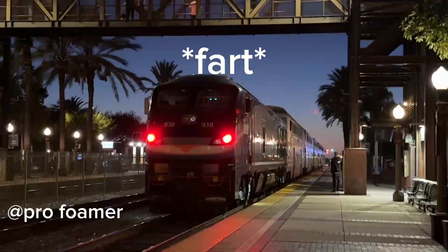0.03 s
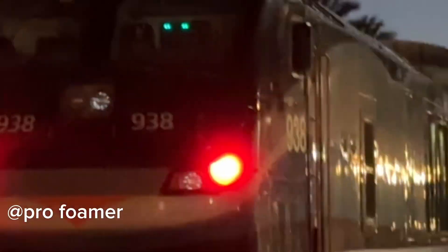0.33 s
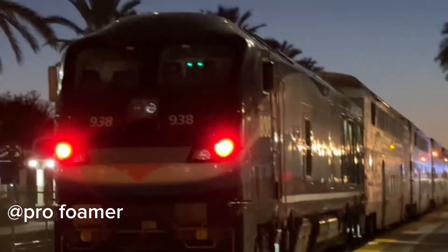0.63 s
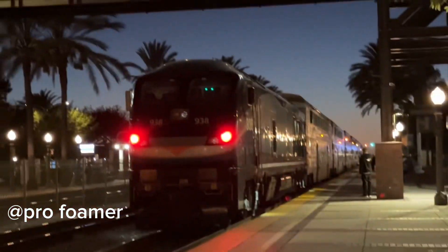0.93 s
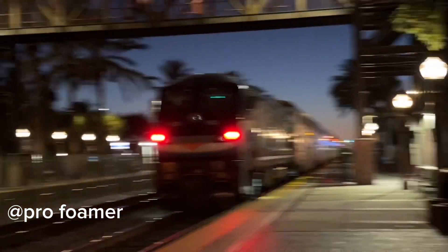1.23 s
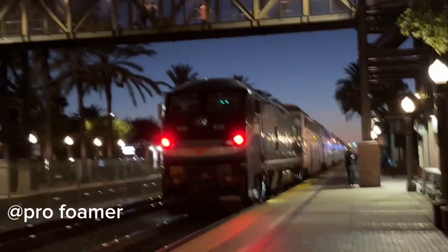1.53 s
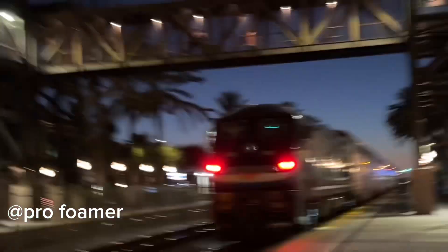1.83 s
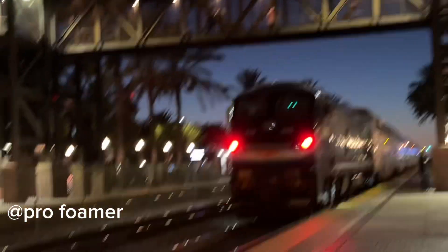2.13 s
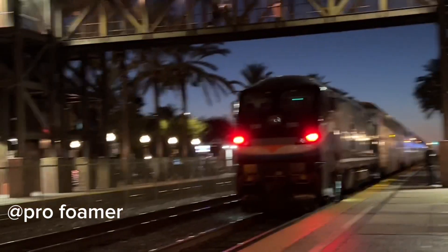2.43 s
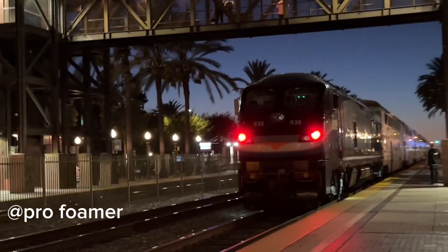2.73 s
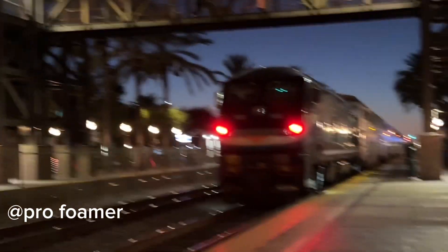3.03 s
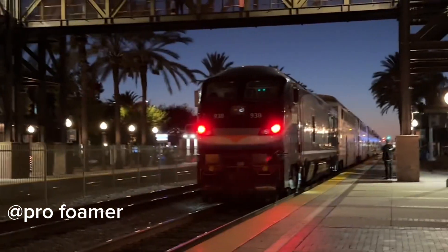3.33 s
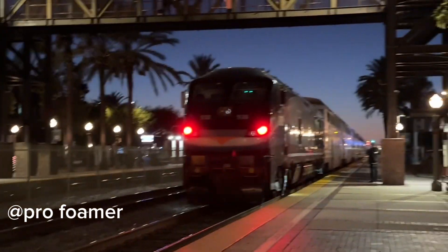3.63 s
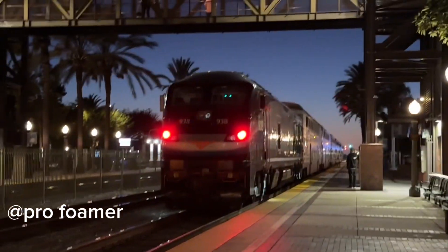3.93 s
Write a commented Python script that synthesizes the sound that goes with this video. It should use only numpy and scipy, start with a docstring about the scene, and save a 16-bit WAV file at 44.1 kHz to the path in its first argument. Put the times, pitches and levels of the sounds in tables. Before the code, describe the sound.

Sharp hisses of air come from a diesel locomotive idling beside an outdoor platform. The low rumble and fan hum run alone at first, then come a burst, a faint leak and a stronger burst, each burst ringing on briefly.

```python
"""An open station platform, where a diesel locomotive idles: throbbing exhaust, fans, electrical hum.
Its air brakes vent through a pipe: a blast that ends in a thin whistle as the valve closes,
a soft steady bleed, then a louder, brighter blast. The hiss rings on between train, platform
and footbridge. The stereo image is mostly narrow, but the top of the hiss sounds wide."""
import sys
import numpy as np
from scipy import signal
from scipy.fft import rfft, irfft, next_fast_len
from scipy.io import wavfile
from scipy.ndimage import map_coordinates

SR = 44100
rng = np.random.default_rng(int(sys.argv[2]) if len(sys.argv) > 2 else 0)


def transcribe(u):
    """Save the signal u as a 16-bit wav file named by the first command-line argument.

    u: samples, shape (n,) or (channels, n), limited to [-1, 1]; the rate is SR.
    q: integer samples, one column per channel.
    """
    v = np.clip(np.atleast_2d(u).T, -1, 1)
    q = np.round(v * 32767).astype(np.int16)
    wavfile.write(sys.argv[1], SR, q)


N = 176400
CYCLE_HZ = 10.0  # the idling engine's cycle


def amp(db):
    """Decibels to gain."""
    return 10 ** (np.asarray(db) / 20)


def along(points, hz):
    """Read (f/Hz, value) points on a log frequency axis."""
    f, v = np.transpose(points)
    return np.interp(np.log(hz + 1), np.log(f + 1), v)


def seconds():
    """The time of every sample."""
    return np.arange(N) / SR


def curve(rows):
    """An envelope of straight lines through (t/s, value) points."""
    return np.interp(seconds(), *np.transpose(rows))


def wobble(rate):
    """Smooth random modulation, rate knots a second."""
    knots = rng.standard_normal(int(N * rate / SR) + 4)
    return map_coordinates(knots, [seconds() * rate], mode="nearest")


def filtered(x, response):
    """EQ x with a response given as a function of frequency."""
    size = next_fast_len(N + SR // 4)
    return irfft(rfft(x, size) * response(np.fft.rfftfreq(size, 1 / SR)), size)[..., :N]


def rush(spectrum, pulsing=1):
    """Two unrelated noises, pulsed and then coloured to the given level per hertz."""
    white = rng.standard_normal((2, N))
    return filtered(white * pulsing, lambda hz: amp(along(spectrum, hz))) * np.sqrt(SR / 2)


def tone(hz):
    """A sine of rms 1 that follows a pitch curve."""
    return np.sqrt(2) * np.sin(2 * np.pi * (np.cumsum(hz) / SR + rng.random()))


# Partials of the exhaust drone: multiple of the engine cycle, level/dB
EXHAUST_PARTIALS = [(4, -42), (5, -31), (6, -35), (7, -35.5), (8, -59.5), (9, -38.5), (10, -24.5),
                    (11, -49), (12, -44), (13, -42), (14, -55.5), (15, -39), (16, -46), (17, -46),
                    (18, -43), (19, -43), (20, -53), (21, -44), (26, -49.5), (28, -53)]
def exhaust(drift=0.00053, flutter_db=.5):
    """A throbbing drone, every partial locked to one nearly steady engine speed."""
    cycle_hz = CYCLE_HZ * (1 + drift * wobble(4.24))
    return sum(amp(db + flutter_db * wobble(3.76)) * tone(k * cycle_hz) for k, db in EXHAUST_PARTIALS)


# Colour of the exhaust rumble: f/Hz, level/dB per Hz
RUMBLE_SPECTRUM = [(20, -94), (33, -86), (45, -66), (62, -49.5), (82, -51.5), (125, -57.5), (160, -51.5),
                   (205, -60), (330, -62), (450, -68.5), (800, -87.5), (2000, -115)]
def rumble(throb=0.31, chug=0.24, flutter_db=1.3):
    """Low noise that chugs with the engine cycle and throbs with the faster exhaust beat."""
    cycle = 2 * np.pi * (CYCLE_HZ * seconds() + rng.random())
    pulsing = 1 + throb * np.sin(5 * cycle) + chug * np.sin(cycle)
    return rush(RUMBLE_SPECTRUM, pulsing * amp(flutter_db * wobble(14)))


# Colour of the fan wash: f/Hz, level/dB per Hz
FAN_SPECTRUM = [(150, -90), (450, -69), (700, -69), (950, -69.8), (1250, -71.5), (1500, -74.5), (2000, -76),
                (2500, -79.5), (3600, -84), (5000, -86.7), (7000, -88.5), (9400, -93), (10100, -98),
                (10700, -104), (11400, -107), (15500, -109.5)]
# Envelope of the band around 1.2 kHz: t/s, level/dB
MID_SWELLS = [(0, -79), (1.4, -69), (1.75, -58), (1.92, -43.5), (2.1, -66), (2.6, -73), (3.0, -80),
              (3.25, -55), (4, -68)]
def fans(flutter_db=0.44, swirl_db=2.0):
    """The cooling fans' broad wash of air, with a midrange band that swells ahead of each blast."""
    wash = rush(FAN_SPECTRUM) * amp(flutter_db * wobble(8.37))
    band = rush([(800, -51), (1120, 15), (1280, 1.5), (1700, -70)])
    swell = amp(curve(MID_SWELLS) + swirl_db * wobble(14))
    return wash + band / band.std() * swell


# Partials of the hum: multiple of its base pitch, level/dB
HUM_PARTIALS = [(3, -52), (12, -59), (14, -59.5), (15, -57), (16, -52), (18, -82)]
def electrical_hum(base_hz=120.03, flutter_db=0.9):
    """Overtones of one almost fixed pitch, each fluttering in level."""
    pitch = base_hz + .02 * wobble(2.18)
    return sum(amp(db + flutter_db * wobble(3.79)) * tone(k * pitch) for k, db in HUM_PARTIALS)


# Fan and pump tones: f/Hz, level/dB, pitch wander/Hz
WHINE_TONES = [(348, -48, 1.8), (356.4, -50, 2.13), (533, -54, 0.79), (612.3, -59.5, 2.12),
               (787, -58.5, 1.1), (928, -62.5, 3.05), (1194, -59.5, 1.65), (1596, -61, 1.05),
               (1990, -79, 0.6), (2507, -63.5, 3.3), (2610, -65.5, 3), (2638, -68, 3), (2990, -66.5, 4.15),
               (3241, -73, 4.04), (3496, -68, 2.9), (3610, -71, 4), (4200, -68, 12), (6100, -74, 11.7)]
def whines(flutter_db=0.9):
    """Spinning fans and pumps sing thin tones, each wavering on its own."""
    return sum(amp(db + flutter_db * wobble(5.99)) * tone(hz + wander * wobble(25))
               for hz, db, wander in WHINE_TONES)


# Envelope of the blower tone: t/s, level/dB
BLOWER_ENVELOPE = [(.1, -50), (1.6, -51), (2.25, -47), (2.6, -50), (3.05, -46.5), (3.2, -44), (3.6, -49),
                   (4, -50)]
def blower(pitch_hz=1075.0, wander_hz=2.1, flutter_db=0.9):
    """The blower's single whine swells and eases."""
    gain = amp(curve(BLOWER_ENVELOPE) + flutter_db * wobble(5.53))
    return gain * tone(pitch_hz + wander_hz * wobble(14))


def valve(t, rise, hold, sag, fall):
    """Envelope of the air flow: it swells, sags with the pressure and dies."""
    opening = np.sin(np.pi / 2 * np.clip(t / rise, 0, 1)) ** 2
    return opening * amp(-sag * np.clip(t - rise, 0, hold) - fall * np.maximum(t - rise - hold, 0))


# Brake cues: t/s, rise/s, hold/s, gain/dB, sag/(dB/s), fall/(dB/s), tilt/(dB/octave), roar lag/s
BRAKE_CUES = [(2.05, 0.14, 0.055, -6.5, 22, 65, -4.5, 0.056), (2.704, 0.083, 0.19, -20, -2, 9, .5, .06),
              (3.311, 0.11, .15, 3, 44, 160, 0.5, 0.045)]
# Colour of the air jet before each cue's gain and tilt: f/Hz, level/dB per Hz
JET_SPECTRUM = [(400, -99), (1000, -75), (1900, -77), (2500, -69), (3200, -69.5), (4000, -68),
                (5200, -68.5), (6500, -65), (7700, -65), (8600, -60), (9600, -62), (10300, -65.5),
                (11200, -73.5), (15500, -74)]
# Resonances of the vent pipe: f/Hz, width/Hz, boost/dB
PIPE_PEAKS = [(3170, 110, 3.5), (6150, 250, 2), (9550, 300, 0.5)]
def brake_air(roar_below_hz=5600, flutter_db=0.63):
    """Each jet starts as a thin hiss and gains body as the valve opens wide; the pipe colours it."""
    def pipe(f):
        return amp(sum(db / (1 + (2 * (f - hz) / width) ** 2) for hz, width, db in PIPE_PEAKS))

    air = np.zeros((2, N))
    for start, rise, hold, gain_db, sag, fall, tilt, lag in BRAKE_CUES:
        t = seconds() - start
        tilted = [(hz, db + tilt * np.log2(hz / 6000)) for hz, db in JET_SPECTRUM]
        jet = filtered(rush(tilted), pipe)
        lows = filtered(jet, lambda hz: 1 / (1 + (hz / roar_below_hz) ** 4))
        hiss = (jet - lows) * valve(t, rise, hold, sag, fall)
        roar = lows * valve(t, rise + lag, max(hold - lag / 2, 0), sag, fall)
        air += (hiss + roar) * amp(gain_db + flutter_db * wobble(40))
    return air


# Whistle cue: start t/s, end t/s, first f/Hz, last f/Hz, top level/dB
WHISTLE_CUE = (2.36, 2.48, 9020, 8950, -48)
def valve_whistle(waver_hz=25):
    """A thin tone that grows and sinks a little in pitch just before the valve seats."""
    start, end, first_hz, last_hz, db = WHISTLE_CUE
    swell = curve([(start, 0), (end - .01, 1), (end, 0)]) ** .5
    pitch = curve([(start, first_hz), (end, last_hz)]) + waver_hz * wobble(140)
    return amp(db) * swell * tone(pitch)


# Reverb decay: f/Hz, t60/s (taken as a magnitude after interpolation)
REVERB_DECAY = [(500, -1.2), (3000, 0.88), (7000, 0.99), (10000, .62), (15000, 0.1)]
# Reverb return EQ: f/Hz, level/dB
REVERB_EQ = [(500, -5), (3000, -2), (7000, -1.5), (10000, -5), (14000, -11)]
def station_reverb(x, build_s=0.014):
    """Echoes scattered by train, platform and footbridge build up, then fade with a dull top end."""
    hz, t, grains = signal.stft(rng.standard_normal((2, SR)), SR, nperseg=256)
    t60 = np.abs(along(REVERB_DECAY, hz))[:, None]
    envelope = amp(-60 * t / t60) * (1 - np.exp(-t / build_s))
    energy = SR * np.mean(envelope ** 2, axis=1, keepdims=True)
    envelope *= amp(along(REVERB_EQ, hz))[:, None] / np.sqrt(energy)
    tail = signal.istft(grains * envelope, SR, nperseg=256)[1]
    return signal.fftconvolve(x, tail, axes=1)[:, :N]


# Phase between left and right: f/Hz, left lead/rad
LEFT_LEAD = [(50, .03), (250, .08), (650, .4), (1300, .22), (2000, 0), (6750, 0), (7100, -.8), (7450, -1.4),
             (7900, -3.14), (8600, -3.14), (9200, -1.4), (10200, -.85), (10800, 0), (13000, 0), (13800, 1),
             (15500, 2)]
# Stereo likeness of the noise: f/Hz, coherence (1 = fully shared)
COHERENCE = [(50, .995), (130, .99), (300, .95), (850, .66), (1400, .88), (2000, .997), (3200, .994),
             (4500, .999), (6700, .999), (7000, .83), (7600, .82), (7900, 1), (8600, 1), (8900, .85),
             (10300, .77), (10900, .999), (13000, .999), (14000, .57)]
def stereo_image(noise, tones):
    """Left and right share the tones and most noise; hiss near 8 kHz is in antiphase and sounds wide."""
    def width(hz):
        angle = np.arccos(np.clip(along(COHERENCE, hz), -1, 1)) / 2
        return np.array([np.cos(angle), np.sin(angle)])

    mid, side = filtered(noise, width)
    stereo = np.array([mid + side, mid - side]) + tones
    return filtered(stereo, lambda hz: np.exp(.5j * np.outer([1, -1], along(LEFT_LEAD, hz))))


def scene():
    """A dry bed of idling locomotive under the brake air, which alone feeds the reverb."""
    tones = exhaust() + electrical_hum() + whines() + blower()
    bed = rumble() + fans()
    air = brake_air() + valve_whistle()
    return stereo_image(bed + air + station_reverb(air), tones)


def record(dry, start_s=.081, top_hz=15720):
    """A hard cut in from silence, then a brick-wall low-pass."""
    gate = np.clip((seconds() - start_s) * SR / 20, 0, 1)
    return filtered(dry * gate, lambda hz: hz < top_hz)


dry = scene()
out = record(dry)
transcribe(out)
```